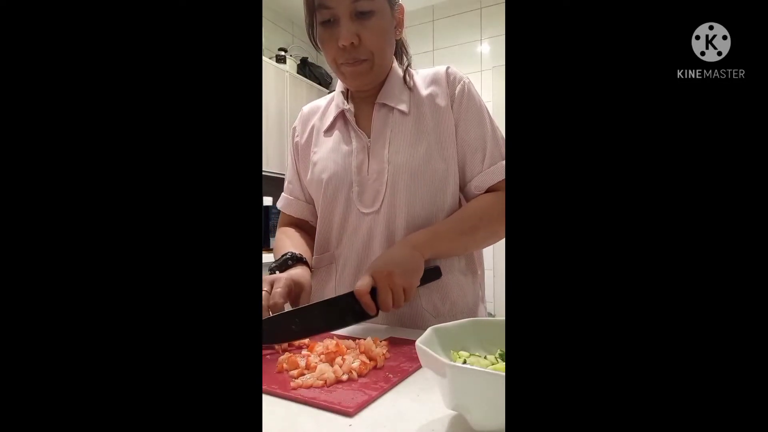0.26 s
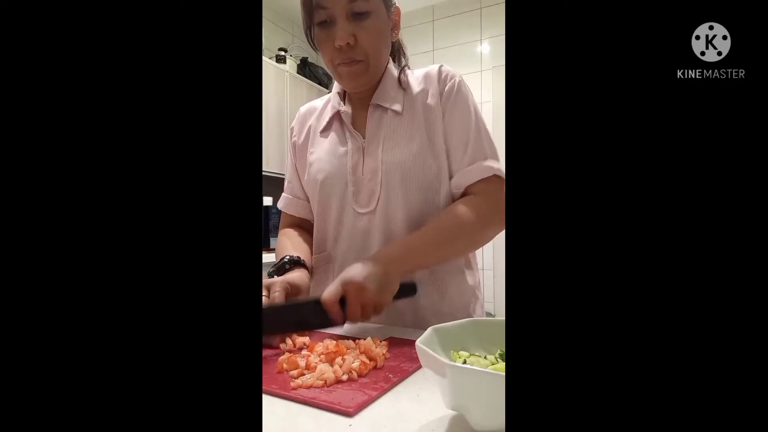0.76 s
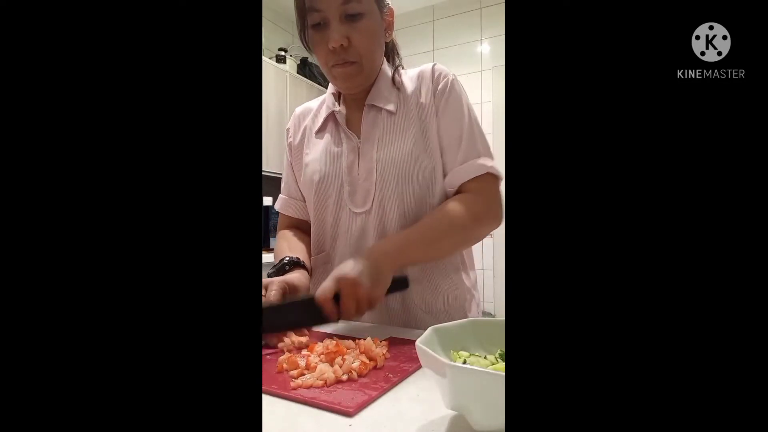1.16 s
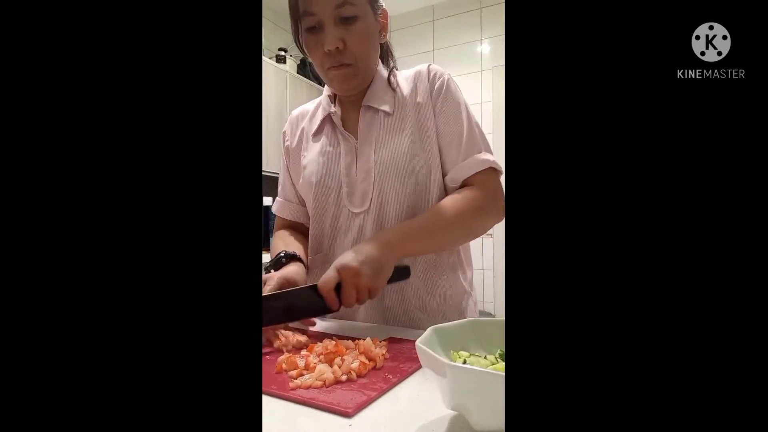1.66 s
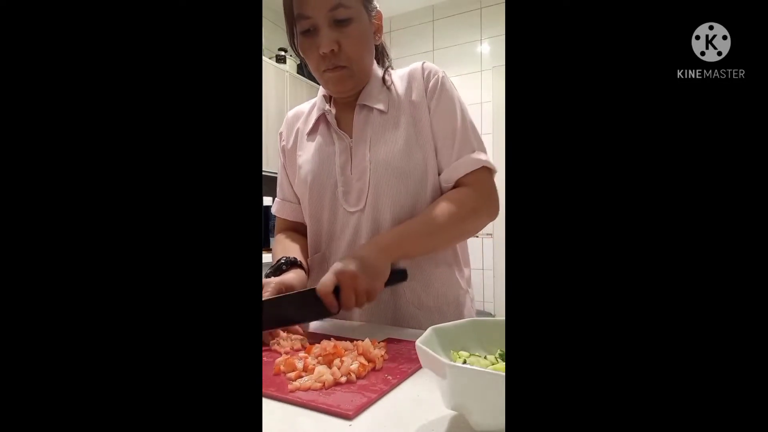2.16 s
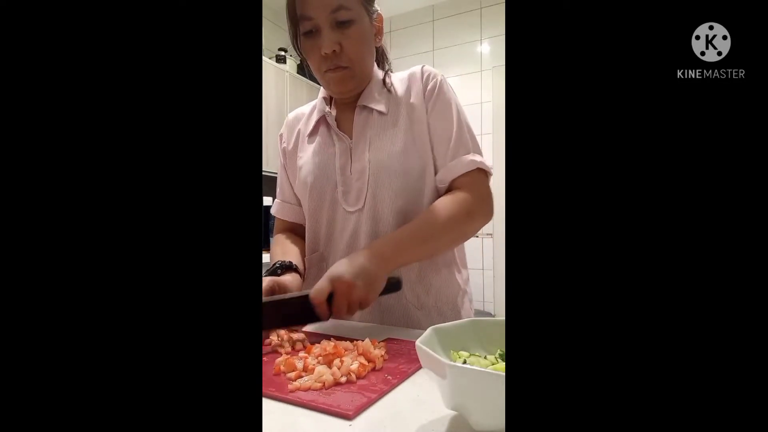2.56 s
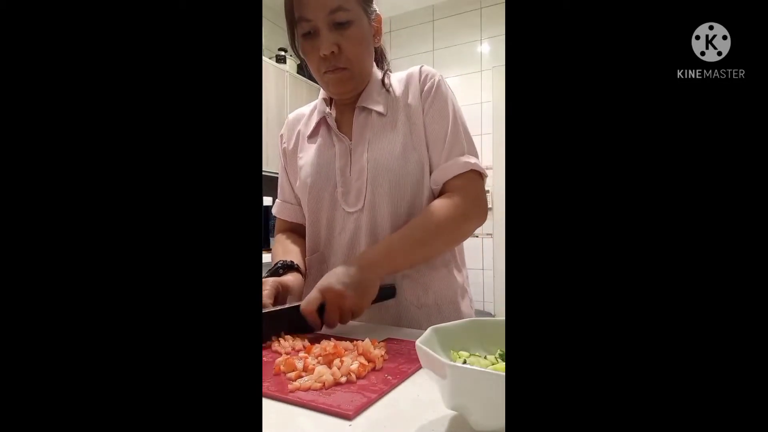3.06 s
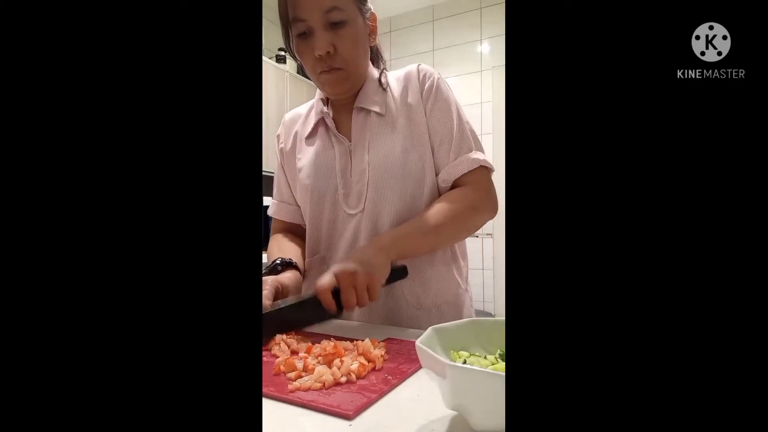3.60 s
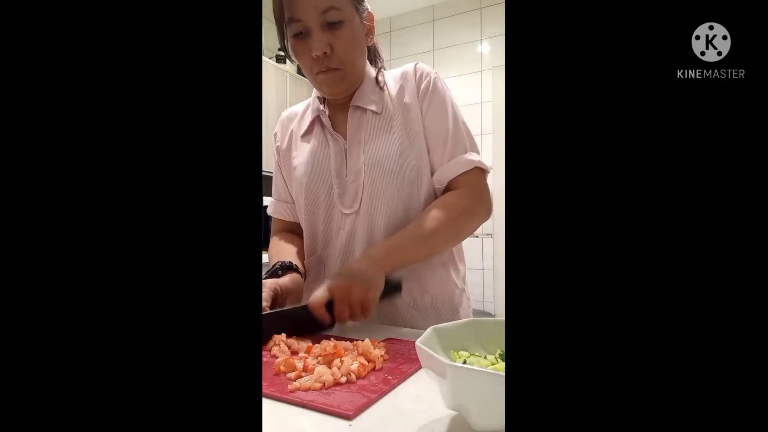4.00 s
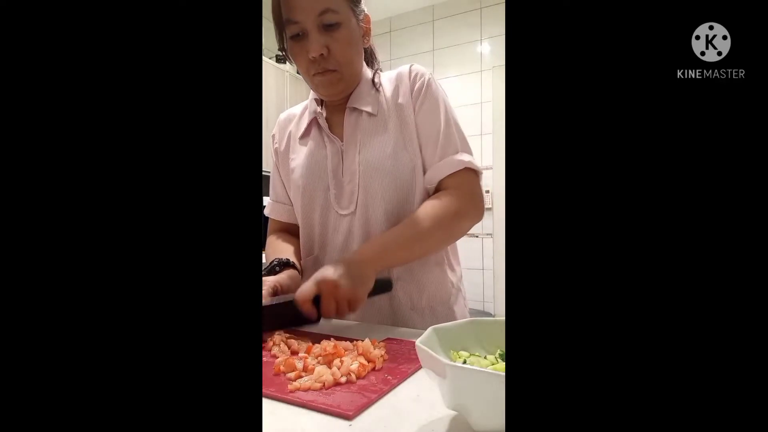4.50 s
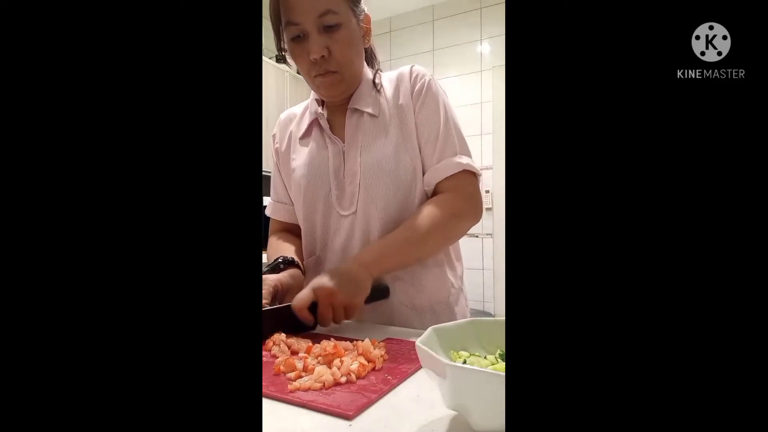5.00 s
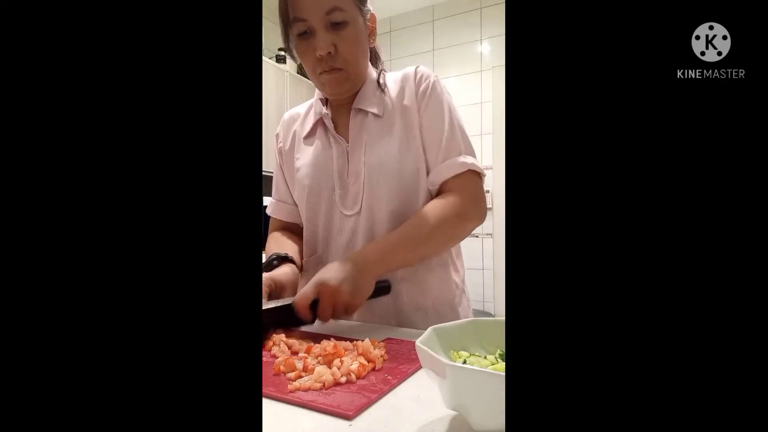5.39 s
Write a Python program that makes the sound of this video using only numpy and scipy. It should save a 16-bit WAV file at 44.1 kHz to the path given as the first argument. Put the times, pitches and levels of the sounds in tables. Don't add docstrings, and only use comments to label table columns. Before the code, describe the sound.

A low, soft fan rumble with a slightly wavering mains hum near 120 Hz runs from start to end in a small tiled kitchen. At about 0.5 s a large knife begins chopping tomato on a plastic board. Every stroke starts with a wet, grainy hiss as the edge slips through skin and flesh, then lands with a short hollow knock, a tiny blade click, a brief loose-board rattle and a dull counter thump; a fainter moist drag follows as the blade lifts. Knocks fall near 0.5, 1.0, 1.3, 1.9, 2.3, 2.9, 3.6, 4.0, 4.3, 4.6, 4.9 and 5.3 s. Those around 1.3, 1.9 and 4.0 are softer; 0.5 and 2.9 are strongest. After a longer gap before 3.6 the pace quickens, and the last two land harder and brighter. Close small microphone, thin deep bass, nearly centred, short tiled echo.

```python
import sys
import numpy as np
from scipy import signal
from scipy.fft import rfft, irfft
from scipy.io import wavfile
from scipy.ndimage import uniform_filter1d, minimum_filter1d

SR = 44100
rng = np.random.default_rng(int(sys.argv[2]) if len(sys.argv) > 2 else 0)


def boost_factor(decibels):
    exponent = np.asarray(decibels, float) / 20
    return 10 ** exponent


def unload_audio(sound):
    columns = np.transpose(np.atleast_2d(sound))
    steps = np.round(np.clip(columns, -1, 1) * 32767)
    wavfile.write(sys.argv[1], SR, steps.astype(np.int16))


N = 249165

# frequency in Hz, level in dB per Hz.
AIR_SPECTRUM = [(25, -66.5), (60, -14.5), (90, -5), (170, -13.5), (400, -13.5), (600, -18.5), (1500, -28),
                (2600, -45), (4500, -53.5), (6200, -48), (6900, -58.5), (7500, -77.5), (12500, -68),
                (15500, -63)]
# time in s, air level in dB.
DRAUGHT = [
    (0.0, -40.5),
    (1.79, -42.5),
    (2.34, -39.5),
    (3.21, -43),
    (4.81, -41),
    (5.65, -43.5),
]
# edge enters in s, peak through skin in dB, through flesh in dB,
# squashed on the board in dB, wet pocket in Hz.
CUTS = [(0.482, -36.5, -27.5, -14.5, 5900), (0.887, -40.5, -34, -22.5, 5800), (1.283, -38, -34, -28, 6130),
        (1.829, -34, -37, -30.5, 6000), (2.234, -42, -32.5, -26, 5900), (2.801, -32, -35, -21.5, 2980),
        (3.582, -32.5, -31.5, -24, 6200), (3.951, -27, -30.5, -21, 6240), (4.279, -24.5, -32, -19.5, 3000),
        (4.583, -24.5, -48, -19, 3050), (4.872, -25, -33, -29, 4550), (5.207, -34, -30, -37, 6140)]
# blade rocks back in s, its peak in dB, peak of the drag in dB, blade
# pulls free in s (tenth row: a slip before its stroke; last: past the end), peak of the pull in dB.
LIFTS = [(0.553, -38, -33, 0.64, -34.5), (0.972, -27, -39.5, 1.03, -38), (1.352, -28.5, -43, 1.42, -43),
         (1.912, -25, -34.5, 1.993, -37), (2.326, -37, -37, 2.468, -32), (2.901, -35, -40, 2.96, -43),
         (3.651, -31.5, -40.5, 3.735, -36.5), (4.004, -42, -48, 4.06, -37.5),
         (4.345, -50, -49, 4.39, -34.5), (4.643, -30, -42, 4.3, -45), (4.934, -27, -50, 4.985, -46),
         (5.282, -39, -46, 6.1, -42)]
# frequency in Hz, level in dB per Hz.
SQUELCH_SPECTRUM = [(300, -55), (900, 1), (1500, 2), (2300, -11.5), (3100, -7), (4000, -9), (4800, -8),
                    (6000, -1), (6900, -5), (7600, -48.5)]
# frequency in Hz, level in dB per Hz.
HISS_SPECTRUM = [(6800, -42), (7800, -21.5), (9000, -7), (10500, -8), (12500, -1.5), (14500, -4),
                 (15600, -0.5), (16500, -44)]
KNOCKS = [(0.536, -16.5, 0, -11.5, -4.5), (0.959, -19.5, -2.5, -12.5, -12), (1.337, -25, 0.5, -8, -11.5),
          (1.874, -26, -4, -18, -18), (2.309, -18, -3.5, -5, -14), (2.871, -15.5, -7, -5, -12),
          (3.637, -19, -3, -8, -10.5), (3.991, -25.5, -3, -16, -26), (4.332, -22, -2, -10.5, -29),
          (4.631, -17.5, -6, -4.5, -19), (4.914, -19, -6, 2, -11.5), (5.259, -18.5, -8, 4, -10)]
# time in s, peak in dB.
PUNCTURES = [(1.865, -33), (2.467, -37), (3.599, -36), (3.961, -32), (4.289, -37), (4.585, -30),
             (4.884, -35)]
# s after the first touch, strength in dB.
TOUCHES = [
    (0, 3),
    (.0028, -4),
    (.0056, 0),
]
# frequency in Hz, level in dB, t60 in s.
COUNTER_MODES = [(76.6, 1, 0.083), (92.8, 11, 0.17)]
# frequency in Hz, level in dB, t60 in s.
BOARD_BOTTOM_MODES = [(142, -5, 0.032), (187.6, -2.5, 0.044), (216.2, -0.5, 0.047), (286, -1.5, 0.055),
                      (307.7, -8, 0.13), (340, -4, 0.092)]
# frequency in Hz, level in dB, t60 in s.
BOARD_LOW_MODES = [(418, 1, 0.064), (456, -6.5, 0.03), (516.6, -2, 0.071), (583, 1, 0.0086)]
# frequency in Hz, level in dB, t60 in s.
BOARD_MID_MODES = [(607, -2, 0.042), (646, -2.5, 0.043), (720, -7.5, 0.048), (883, 2.5, 0.02)]
# frequency in Hz, level in dB, t60 in s.
BOARD_UPPER_MODES = [(870, -1, 0.0094), (1050, 1, 0.023), (1097, 4.5, 0.021), (1260, 0.5, 0.026),
                     (1280, 1.5, 0.021), (1428, -1.5, 0.057), (1567, 1, 0.017)]
# frequency in Hz, level in dB, t60 in s.
BOARD_HIGH_MODES = [(1653, -1.5, 0.022), (1817, -2.5, .016), (1927, -3, 0.018), (2040, -1, 0.012),
                    (2240, -2, 0.012)]
# frequency in Hz, level in dB, t60 in s.
BLADE_MODES = [(2590, -4, 0.031), (2840, -7, 0.011), (3150, -7.5, 0.004), (3510, 4.5, 0.0092),
               (3850, -3, 0.012), (4580, -4, 0.013), (5100, 0, 0.011), (5700, -4.5, 0.02)]
# band top in Hz, t60 in s.
KITCHEN_DECAY = [(100, 0.097), (400, 0.34), (1500, 0.25), (6000, 0.29)]
# frequency in Hz, side over mid in dB.
SIDE_SPECTRUM = [(40, 5), (100, -34), (600, -23.5), (2000, -51.5), (5000, -30.5), (9000, -18), (13000, -25)]


def unit_rms(x):
    return x / np.sqrt(np.mean(x ** 2) + 1e-20)


def filtered(x, order, hz, kind="low"):
    return signal.sosfilt(signal.butter(order, hz, kind, fs=SR, output="sos"), x)


def coloured(x, spectrum):
    size = 4096
    hz, db = np.transpose(spectrum)
    bins_hz = np.fft.rfftfreq(size, 1 / SR)
    log_gain = np.log(boost_factor(np.interp(np.log(bins_hz + 1), np.log(hz), db)))
    cepstrum = irfft(log_gain)
    cepstrum[1:size // 2] *= 2
    cepstrum[size // 2 + 1:] = 0
    response = irfft(np.exp(rfft(cepstrum)))
    return signal.fftconvolve(x, response)[:N]


def drift(rate_hz):
    step = 40
    r = np.exp(-2 * np.pi * step * rate_hz / SR)
    white = rng.standard_normal(N // step + 2002)
    slow = signal.lfilter([1], [1, -2 * r, r * r], white)[2000:]
    return np.interp(np.arange(N) / step, np.arange(len(slow)), unit_rms(slow))


def ring(clicks, hz, t60_s):
    r = boost_factor(-60 / (t60_s * SR))
    w = 2 * np.pi * hz / SR
    return signal.lfilter([0, np.sin(w)], [1, -2 * r * np.cos(w), r * r], clicks + 1e-18)


def fan():
    hum_hz, wobble_hz, hum_db = 120.4, 0.41, -37.5
    air = unit_rms(coloured(rng.standard_normal(N), AIR_SPECTRUM)) * boost_factor(0.4 * drift(8))
    air_db = np.interp(np.arange(N) / SR, *np.transpose(DRAUGHT)) + 4.5
    phase = 2 * np.pi * np.cumsum(hum_hz + wobble_hz * drift(4.2)) / SR
    hum = np.sqrt(2) * np.sin(phase) * boost_factor(1.85 * drift(5.2))
    return boost_factor(air_db) * air + boost_factor(hum_db) * hum


def slips():
    through_skin, through_flesh = (-13, 0.018, 0.053), (-11, 0.042, 0.13)
    squashed, rebound = (-11.5, 0.006, 0.033), (-8, 0.0033, 0.04)
    dragged, pulled = (-11.5, 0.028, 0.41), (-14.5, 0.011, 0.084)
    flesh_share = 0.49
    squash_lead_s, drag_delay_s = 0.003, 0.02
    crushed_hz, suction_hz = 3250, 5900
    rows = []
    for knock, cut, lift in zip(KNOCKS, CUTS, LIFTS):
        knock_s = knock[0]
        enter_s, skin_db, flesh_db, squash_db, wet_hz = cut
        rock_s, rock_db, drag_db, pull_s, pull_db = lift
        flesh_s = enter_s + flesh_share * (knock_s - enter_s)
        rows += [
            (enter_s, skin_db, wet_hz, *through_skin),
            (flesh_s, flesh_db, wet_hz, *through_flesh),
            (knock_s - squash_lead_s, squash_db, crushed_hz, *squashed),
            (rock_s, rock_db, suction_hz, *rebound),
            (knock_s + drag_delay_s, drag_db, suction_hz, *dragged),
            (pull_s, pull_db, suction_hz, *pulled),
        ]
    return rows


def slicing():
    grains = rng.standard_normal((2, N)) * boost_factor(1.6 * rng.exponential(1, (2, N)))
    squelch = unit_rms(coloured(grains[0], SQUELCH_SPECTRUM))
    hiss = unit_rms(coloured(grains[1], HISS_SPECTRUM))
    power, pockets = np.zeros((2, N + SR)), np.zeros(N + SR)
    t = np.arange(SR // 4) / SR
    rows = slips()
    others_hz = rng.uniform([2600, 4500, 9500], [4500, 6600, 14500], (len(rows), 3))
    for (s, db, wet_hz, bright_db, held_s, t60_s), (low_hz, mid_hz, top_hz) in zip(rows, others_hz):
        start = round((s - 0.005) * SR)
        at = slice(start, start + len(t))
        swell = np.minimum(t / 0.011, 1) ** 2
        fade_db = 60 * np.maximum(t - 0.008 - held_s, 0) / max(t60_s, 0.01)
        shape = swell * boost_factor(db - 23 - fade_db)
        power[:, at] += shape ** 2 * boost_factor([[0], [2 * bright_db]])
        burst = np.roll(grains[0], -start)[:len(t)]
        for hz, pocket_db in [(wet_hz, -0.5), (low_hz, -7), (mid_hz, -7), (top_hz, bright_db + 5)]:
            pockets[at] += boost_factor(pocket_db) * shape * unit_rms(ring(burst, hz, 32 / hz))
    low, high = np.sqrt(power[:, :N])
    low = low * boost_factor(3 * drift(70))
    high = uniform_filter1d(high * boost_factor(1.8 * drift(45)), size=300)
    wet = boost_factor(3 * drift(35) - 2.2) * pockets[:N]
    return boost_factor(6.5) * low * squelch + boost_factor(11.5) * high * hiss + wet


def struck(modes, s, blow_db, late_s, spread_s=0.0018, scatter_db=0.42, count=3):
    out = np.zeros(N)
    after_s, touch_db = np.transpose(TOUCHES[:count])
    shape = (len(s), len(modes), count)
    strength, delay = rng.standard_normal(shape), rng.random(shape)
    for k, (hz, db, t60_s) in enumerate(modes):
        clicks = np.zeros(N)
        touch_s = s[:, None] + late_s + after_s + spread_s * delay[:, k]
        click_db = blow_db[:, None] + db + touch_db + scatter_db * strength[:, k]
        clicks[(touch_s * SR).astype(int)] = (-1) ** k * boost_factor(click_db)
        out += ring(clicks, hz, t60_s)
    return out


def board(s, force, weight, hard, edge):
    mids_follow = 0.32
    out = struck(BOARD_BOTTOM_MODES, s, force + weight + 9, late_s=0.0012, spread_s=0.00077, count=1)
    out += struck(BOARD_LOW_MODES, s, force + 5.56, late_s=0.0009, spread_s=0.0011, count=1)
    mid_db = force + mids_follow * hard + 3.1
    out += struck(BOARD_MID_MODES, s, mid_db, late_s=0.0002, spread_s=0.0012)
    out += struck(BOARD_UPPER_MODES, s, force + hard + 0.1, late_s=0.00016, spread_s=0.00122)
    out += struck(BOARD_HIGH_MODES, s, force + edge + 3.2, late_s=0.00027, spread_s=0.0011)
    nudge_s, nudge_db = np.transpose(PUNCTURES)
    nudged_modes = BOARD_MID_MODES + BOARD_UPPER_MODES
    out += struck(nudged_modes, nudge_s, nudge_db - 12.5, late_s=0.00022, spread_s=0.00317)
    return filtered(out, 2, 3000)


def knocks():
    crack_follows = 1.57
    s, force, weight, hard, edge = np.transpose(KNOCKS)
    thump = struck(COUNTER_MODES, s, force + weight - 2.5, late_s=-0.0014)
    thump = filtered(thump, 3, [60, 150], "band")
    plastic = board(s, force, weight, hard, edge)
    blade = struck(BLADE_MODES, s, force + crack_follows * edge - 3.5, late_s=-0.0005)
    return thump + plastic + filtered(blade, 3, 7000)


def rattle():
    crack_db, crack_t60_s = -13.5, 0.017
    buzz_db, buzz_t60_s = -8.5, 0.052
    levels = np.zeros((2, N + SR))
    t = np.arange(SR // 5) / SR
    for s, force, _, hard, edge in KNOCKS:
        at = slice(round(s * SR), round(s * SR) + len(t))
        crack_fade = boost_factor(force + 1.4 * edge + crack_db - 60 * t / crack_t60_s)
        buzz_fade = boost_factor(force + 0.25 * hard + buzz_db - 60 * t / buzz_t60_s)
        levels[0, at] += crack_fade * np.minimum(t / 0.00055, 1)
        levels[1, at] += buzz_fade * np.minimum(t / 0.00066, 1)
    noise = rng.standard_normal((2, N)) * levels[:, :N] + 1e-18
    crack = filtered(noise[0], 2, [1500, 6500], "band")
    buzz = filtered(noise[1], 2, [450, 1900], "band")
    return 2 * crack + 4 * buzz


def kitchen(x):
    t = np.arange(SR // 2) / SR
    white = rng.standard_normal((2, len(t)))
    answers, below = 0, 0
    for top_hz, t60_s in KITCHEN_DECAY:
        under = filtered(white, 2, top_hz)
        answers = answers + (under - below) * boost_factor(-60 * t / t60_s)
        below = under
    answers = answers * np.clip(t / 0.0052 - 0.3, 0, 1)
    return [signal.fftconvolve(x, a / np.sqrt(np.sum(a ** 2) * 4))[:N] for a in answers]


def scene():
    room_db = -6
    close = knocks() + slicing() + rattle()
    echo, other_echo = kitchen(filtered(close, 2, 170, "high"))
    mid = close + boost_factor(room_db) * echo + fan()
    side = coloured(boost_factor(-4) * other_echo + fan() + slicing(), SIDE_SPECTRUM) - 0.03 * mid
    return np.array([mid + side, mid - side])


def limited(x):
    release_db_per_s = 120
    ramp_db = release_db_per_s * np.arange(N) / SR
    over_db = np.maximum(20 * np.log10(np.abs(x).max(axis=0) + 1e-9) + 0.3, 0)
    duck_db = np.maximum.accumulate(over_db + ramp_db) - ramp_db
    gain_db = uniform_filter1d(minimum_filter1d(-duck_db, size=177), size=88)
    return x * boost_factor(gain_db)


def low_pass(x):
    return signal.sosfilt(signal.butter(12, 16480, fs=SR, output="sos"), x)


def record(dry):
    cutoff_hz = 15850
    x = filtered(dry, 3, 55, "high")
    x = signal.sosfilt(signal.cheby2(14, 60, cutoff_hz + 150, fs=SR, output="sos"), x)
    return low_pass(limited(x))


dry = scene()
out = record(dry)
unload_audio(out)
```